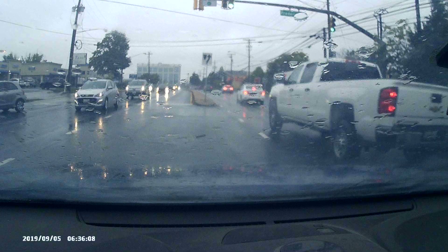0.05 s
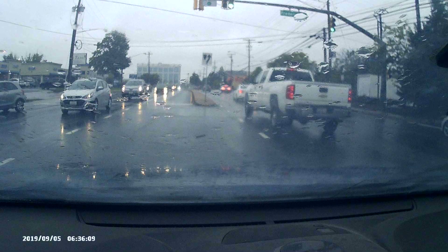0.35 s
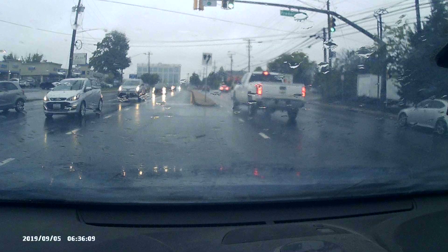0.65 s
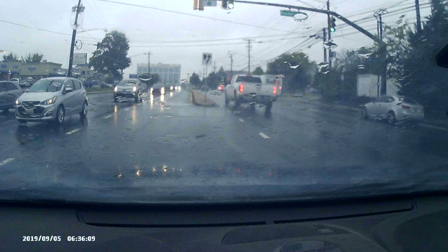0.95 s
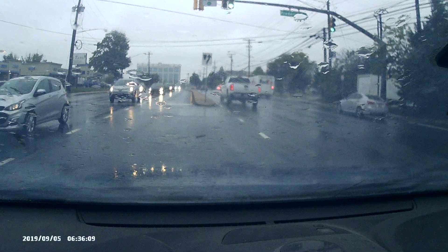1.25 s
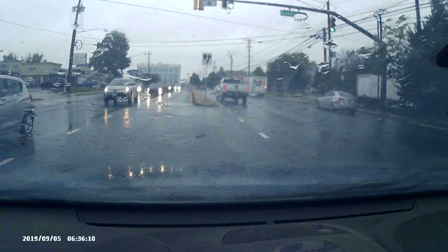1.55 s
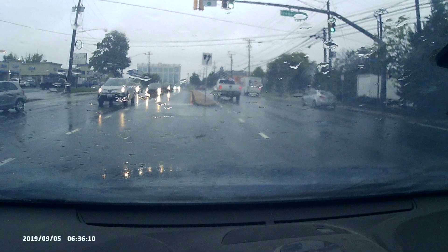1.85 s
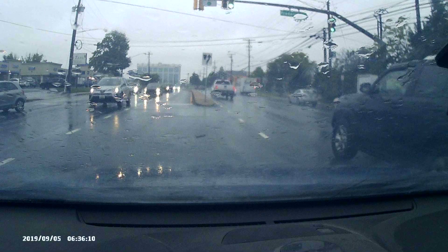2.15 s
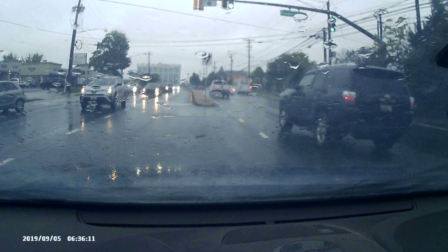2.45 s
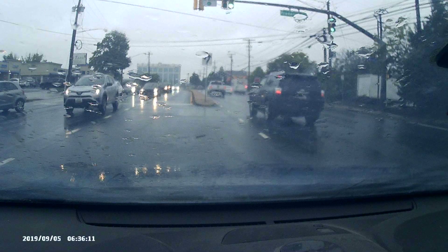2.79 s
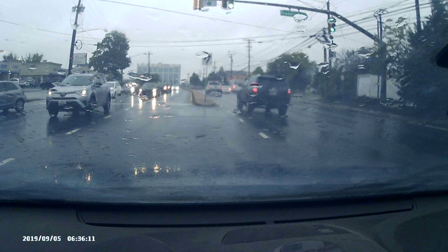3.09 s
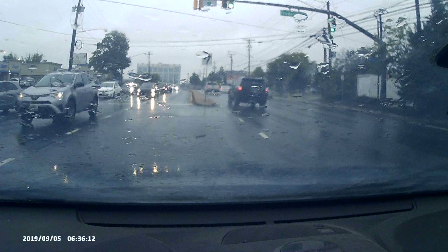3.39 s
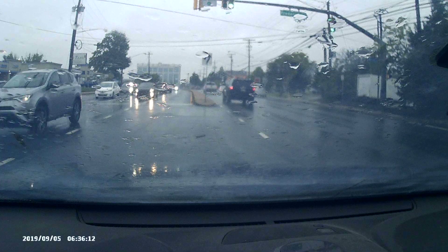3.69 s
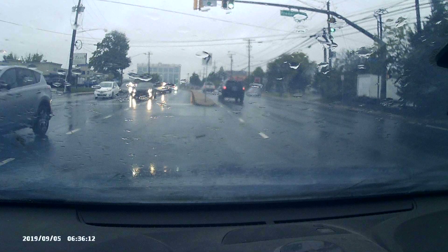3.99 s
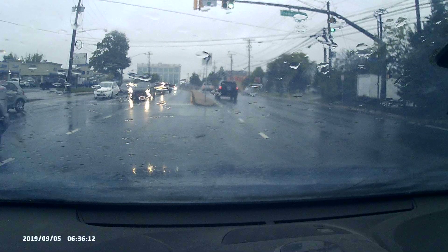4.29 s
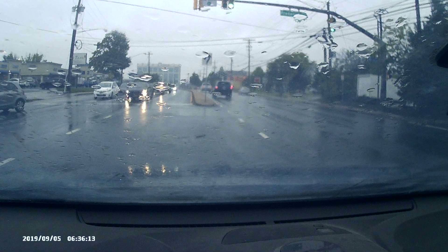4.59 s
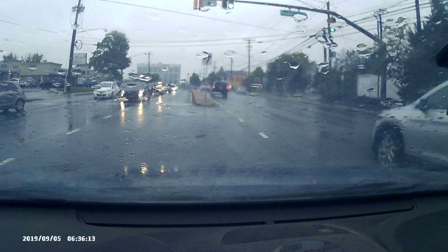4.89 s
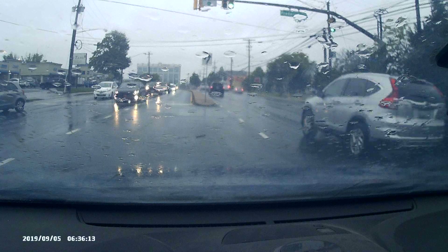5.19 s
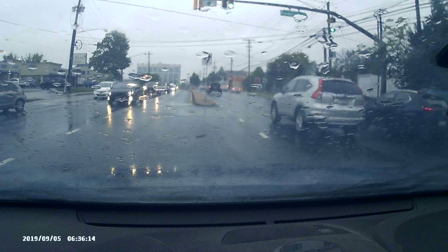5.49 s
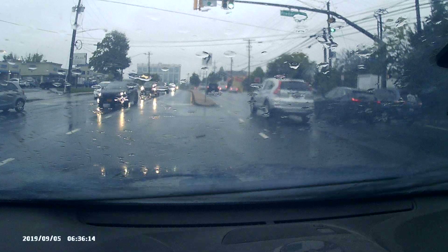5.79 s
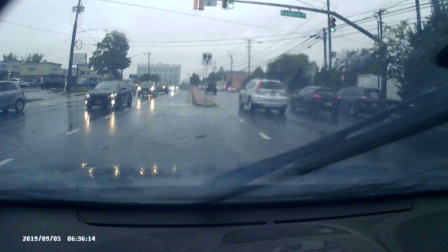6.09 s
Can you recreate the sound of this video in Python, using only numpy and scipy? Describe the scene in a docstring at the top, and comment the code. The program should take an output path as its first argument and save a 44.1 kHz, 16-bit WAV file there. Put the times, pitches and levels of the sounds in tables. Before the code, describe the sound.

Inside a closed car waiting at a wet intersection, the engine idles with a low, throbbing boom and the turn signal ticks and tocks evenly. Other cars pass outside with muffled engine drone, tyre roar and a hiss of spray. About a second in, something is handled, with a few knocks on plastic trim, crackles and rubbing. At the very end the wipers give one dull thud.

```python
"""Idling at a wet intersection

Inside a car, the engine's firing pulses boom low while the turn signal relay ticks and tocks.
Other engines drone through the closed body; passing tyres roar and throw spray off the wet road.
About a second in, something is handled: knocks on the trim, crackles and rubbing. Later comes
a faint squeak, and at the very end the wipers turn round with a thud."""
import sys
import numpy as np
from scipy import signal
from scipy.fft import rfft, irfft
from scipy.io import wavfile

SR = 44100
rng = np.random.default_rng(int(sys.argv[2]) if len(sys.argv) > 2 else 0)


def unload_audio(sound):
    """Save the sound as a 16-bit wav file, at the path given as the first command line argument."""
    columns = np.transpose(np.atleast_2d(sound))
    # keep every value between -1 and 1, then stretch to whole-number steps
    steps = np.round(np.clip(columns, -1, 1) * 32767)
    wavfile.write(sys.argv[1], SR, steps.astype(np.int16))


N = 270980
T = np.arange(N) / SR

# partials of the idle: (multiple of the firing rate, relative level [dB])
IDLE_ORDERS = [(.5, -20), (1, 0), (2, -18), (3, -27), (4, -34)]
# brief dips in its boom: (time [s], half width [s], depth [dB])
IDLE_DIPS = [(1.23, 0.023, 16), (1.39, 0.038, 10.5), (1.65, 0.21, 4)]
# a second low tone that throbs against the idle: (time [s], level [dB])
THROB_LEVEL = [(0, -46), (1.4, -49), (3, -55), (4.6, -50), (5.4, -43.5), (6.14, -43.5)]
# the relay's ring: (frequency [Hz], weight closing [dB], weight opening [dB], t60 [s])
RELAY_MODES = [(1290, -8.5, -29.5, 0.18), (1782, 1.5, -9, 0.086), (1930, -17, -13, 0.065),
               (2430, -23, -26.5, 0.029), (2560, 3, -10, 0.044), (2920, -3.5, -8.5, 0.026),
               (3670, -1.5, -12.5, 0.09), (3860, -4.5, -12.5, 0.048), (4034, -5, -2, 0.068),
               (4400, -4, -4, 0.1), (4530, -23, -7, 0.056), (4900, -7.5, -12.5, 0.054)]
# clicks of its contacts, closing and opening: (frequency [Hz], relative level [dB])
TICK_CLICK = [(700, -29.5), (1300, 2.5), (1900, 3.5), (2800, 1.5), (4200, 0), (5500, -3.5), (7400, -5.5),
              (8600, -15)]
TOCK_CLICK = [(700, -21), (1500, -7), (3300, -9), (3900, 3.5), (4500, -2), (5000, -12.5), (6500, -21),
              (8500, -26)]
# cars going by, each at its nearest:
# (time [s], distance [m], rumble [dB], roar [dB], swish [dB], glass hiss [dB], spray [dB])
PASSES = [(-.1, 6.5, -42, -56, -66.5, -75, -77.5), (1.498, 4.4, -50.5, -68.5, -72, -74.5, -68),
          (2.43, 4.3, -44.5, -60, -75.5, -78, -83), (3.7, 5.1, -58, -74, -79, -79.5, -74.5),
          (5.7, 6.8, -55, -63, -74, -73.5, -79)]
# colours of the tyre noises: (frequency [Hz], relative level [dB])
RUMBLE = [(8, 0.5), (22, 6), (42, -2.5), (60, -5), (85, -0.5), (130, -7.5), (200, -16), (260, -14),
          (340, -14.5), (450, -24.5), (700, -34), (1500, -72.5)]
ROAR = [(200, -19), (400, 2), (520, 1), (690, 0.5), (770, -1), (870, -2.5), (1050, -5), (1300, -10.5),
        (2000, -29), (4000, -55)]
SWISH = [(700, -25), (1300, -1), (1750, 1.5), (2100, 0.5), (2550, -2.5), (2950, 0), (3400, -3),
         (4000, -4.5), (5000, -9.5), (8000, -36)]
SPRAY = [(1500, -20), (3000, -7.5), (4200, -2.5), (5200, 1.5), (6300, -0.5), (7400, -4), (8500, -14)]
TREAD = [(400, -34), (720, -3), (860, 5.5), (980, -4.5), (1150, -10), (1800, -36.5)]
GLASS_HISS = [(1800, -33.5), (2600, -6.5), (2950, 1.5), (3400, -3.5), (3900, -4.5), (5500, -27)]
# an engine pulling away through two gear changes: (time [s], firing rate [Hz], level outside [dB])
PULLING_ENGINE = [(0.0, 55.3, -35), (0.07, 57.46, -41), (0.31, 56.73, -36.5), (0.65, 52.47, -44),
                  (1.25, 51.3, -50), (1.49, 44.18, -43.5), (1.73, 41.37, -51.5), (1.85, 42.82, -46.5),
                  (2.1, 50.0, -46.5), (2.41, 51.84, -47.5), (4.21, 49.79, -50.5), (4.58, 46.23, -50.5),
                  (4.96, 44.96, -51.5), (5.08, 42.77, -50.5), (5.23, 44.23, -52.5), (5.3, 42.08, -49),
                  (5.68, 42.66, -52.5), (6.14, 40.3, -51)]
# how the car body lets its harmonics in: (frequency [Hz], gain [dB])
BODY_GAIN = [(42, -8.5), (57, -8), (82, -2.5), (112, -1), (126, -12), (141, -13.5), (154, -7.5),
             (170, -19.5), (186, -8), (202, -6.5), (220, -26.5), (250, -22), (284, -15), (308, -15.5),
             (345, -28)]
# a steadier engine further off: (time [s], firing rate [Hz], fundamental [dB], octave [dB])
FAR_ENGINE = [(0, 74, -35, -62), (.45, 74.5, -41, -52.5), (.8, 76, -51, -61), (1.1, 77, -53, -49),
              (1.6, 79, -55.5, -66.5), (6.14, 76.5, -54.5, -73.5)]
# knocks on the cabin trim: (time [s], gain [dB], hollow low modes against the high ones [dB])
KNOCKS = [(0.8497, -39, 4), (0.8533, -28.5, 5), (.862, -59, 2), (.929, -38, -6), (.975, -38.5, 7.5),
          (1.056, -45, -24), (1.248, -35, 7), (6.119, -46, -6), (6.124, -38, -14)]
# the trim's ring: (frequency [Hz], weight [dB], t60 [s])
TRIM_MODES = [(228, -3.5, .14), (510, -4, 0.018), (675, 2.5, 0.043), (900, -4.5, 0.038), (1120, -26.5, .05),
              (1566, -6, 0.045), (2060, -10.5, .03), (2620, 4, 0.015), (2930, 1, 0.022), (3770, -21, 0.048)]
# small dry crackles: (time [s], gain [dB])
CRACKLES = [(0.9203, -47), (0.9543, -42.5), (0.9742, -47), (1.013, -48.5), (1.037, -47.5), (1.5165, -53),
            (6.0653, -46), (6.1206, -41.5), (6.1374, -45.5)]
# rubs of the handled thing: (start [s], length [s], starting gain [dB])
RUBS = [(.81, .07, -57), (.96, .22, -52), (1.5, .12, -78)]
# colours of a knock's click, a crackle, a slip and the wiper thud: (frequency [Hz], relative level [dB])
TRIM_CLICK = [(200, 10), (700, 13.5), (1500, -4.5), (3000, -1.5), (4000, -13.5), (6000, -14), (8500, -32)]
CRACKLE_CLICK = [(500, -22.5), (1500, 2.5), (3000, 7), (4200, 4), (5600, 4.5), (7500, -2.5), (8600, -5.5)]
SLIP = [(150, 12), (450, 7), (900, -3), (1550, 4), (2200, -3), (3000, -3), (4500, -9.5), (8000, -18.5)]
WIPER_THUD = [(10, 18.5), (28, -1), (60, -9), (125, -6), (170, -2.5), (230, -4), (380, -19), (700, -20),
              (1100, -30), (2000, -35.5), (4000, -55)]
# the two steps of a squeak: (start [s], length [s], pitch [Hz], level [dB])
SQUEAKS = [(3.955, .025, 2750, -68), (3.972, .045, 3120, -70)]


def idle(firing_hz=33.4, sag_hz_per_s=.1, level_db=-33, fan_hz=318.5, fan_db=-72, throb_hz=40.8):
    """Firing pulses boom in the cabin as an almost pure low tone that throbs; a fan hums faintly."""
    dips_db = sum(depth_db * bell(s, half_width) for s, half_width, depth_db in IDLE_DIPS)
    cycles = np.cumsum(firing_hz - sag_hz_per_s * T) / SR
    boom = np.zeros(N)
    for order, db in IDLE_ORDERS:
        waver_db = (.85 if order == 1 else 2) * drift(8.6)
        boom += amp(db + waver_db) * tone(order * cycles)
    fan_gain = amp(fan_db + 3.4 * drift(2.3))
    fan = fan_gain * np.sin(2 * np.pi * np.cumsum(fan_hz + 1.5 * drift(4)) / SR)
    throb = amp(curves(THROB_LEVEL)[0]) * tone(throb_hz * T)
    return np.sqrt(2) * (amp(level_db - dips_db) * boom + fan + throb)


def turn_signal(blink_s=.70087, first_tick_s=.3935, first_tock_s=.044, tick_db=-45.5, tock_db=-55):
    """The relay snaps shut, then falls open with a bounce; the windscreen reflects each click."""
    hz, shut_db, open_db, t60 = np.transpose(RELAY_MODES)
    tick = amp(-9) * ring(hz, shut_db, t60) + amp(-4) * snap(TICK_CLICK, crack_db=.5, t60=.034)
    tock = amp(-2) * ring(hz, open_db, t60) + amp(-2) * snap(TOCK_CLICK, crack_db=2, t60=.066)
    tick = echoes(tick, [(.0145, -13)])
    tock = echoes(tock, [(.0035, -14), (.0135, -14)])
    out = np.zeros(N)
    for first_s, db, sound, spectrum in ((first_tick_s, tick_db, tick, TICK_CLICK),
                                         (first_tock_s, tock_db, tock, TOCK_CLICK)):
        for s in np.arange(first_s, N / SR, blink_s):
            variation = .26 * burst(spectrum, t60=.085, rise=.0023)
            add(out, s, amp(db) * (sound + variation))
    return out


def tyres(spray_shadow=2.7):
    """Passing tyres rumble through the body, roar and throw water, over a wash of distant traffic."""
    _, _, rumble_db, roar_db, swish_db, glass_db, spray_db = np.transpose(PASSES)
    rumble = going_by(rumble_db, wash_db=-50.5) * noise(RUMBLE, flutter_db=2.5, flutter_hz=4.9)
    roar = going_by(roar_db, wash_db=-66) * noise(ROAR, flutter_db=1.04, flutter_hz=22)
    swish = going_by(swish_db, wash_db=-73.5) * noise(SWISH, flutter_db=-.3, flutter_hz=50)
    # spray is thrown forward, so it fades faster once the car is past
    spray_gain = going_by(spray_db, wash_db=-78.5, shadow=spray_shadow)
    spray = spray_gain * noise(SPRAY, flutter_db=1, flutter_hz=80)
    # the tread sings ahead of each car and again as it passes
    ahead = going_by(roar_db - 7.5, wash_db=-71, lead_s=.85)
    alongside = going_by(roar_db - 12.5, wash_db=-np.inf)
    tread = np.hypot(ahead, alongside) * noise(TREAD, flutter_db=1.5, flutter_hz=7.6)
    hiss = going_by(glass_db, wash_db=-81.5) * noise(GLASS_HISS, flutter_db=1, flutter_hz=40)
    return rumble + roar + swish + spray + tread + hiss


def going_by(peaks_db, wash_db, lead_s=0, shadow=1, speed_m_per_s=15.4):
    """Fader for one tyre layer: each car falls off as 1 / distance, and their powers add to the wash."""
    power = amp(wash_db) ** 2
    for (s, distance_m, *_), db in zip(PASSES, peaks_db):
        along_m = speed_m_per_s * (T - s + lead_s)
        along_m = np.where(along_m > 0, shadow * along_m, along_m)
        power = power + amp(db) ** 2 / (1 + (along_m / distance_m) ** 2)
    return np.sqrt(power)


def engines(hum_s=2.92, hum_hz=238.5, hum_sag_hz_per_s=42, hum_db=-60.5):
    """One engine pulls away, one holds steady, and an overtaking car's hum swells and falls in pitch."""
    hz, outside_db = curves(PULLING_ENGINE)
    body_hz, body_db = np.transpose(BODY_GAIN)
    inside_db = [outside_db + np.interp(np.log(k * hz), np.log(body_hz), body_db) for k in range(1, 7)]
    pulling = drone(hz, inside_db, jitter=.0035, waver_db=1.5)
    hz, fundamental_db, octave_db = curves(FAR_ENGINE)
    steady = drone(hz, [fundamental_db, octave_db], jitter=.0036, waver_db=2.2)
    hum = drone(hum_hz - hum_sag_hz_per_s * (T - hum_s), [hum_db], jitter=.0034, waver_db=.1)
    return pulling + steady + bell(hum_s, half_width=.45) * hum


def drone(hz, levels_db, jitter, waver_db):
    """An engine heard through the car body: only its lowest harmonics get in."""
    cycles = np.cumsum(hz * (1 + jitter * drift(11))) / SR
    partials = [amp(db + waver_db * drift(3.6)) * tone(k * cycles) for k, db in enumerate(levels_db, 1)]
    return np.sqrt(2) * sum(partials)


def handling(hollow_below_hz=1200):
    """Knocks ring the plastic trim; dry crackles fall among them."""
    out = np.zeros(N)
    hz, mode_db, t60 = np.transpose(TRIM_MODES)
    for s, db, hollow_db in KNOCKS:
        body = amp(-6) * ring(hz, mode_db + hollow_db * (hz < hollow_below_hz), t60)
        click = amp(-12) * snap(TRIM_CLICK, crack_db=12, t60=.12)
        add(out, s, amp(db) * (body + click))
    for s, db in CRACKLES:
        add(out, s, amp(db - 5) * snap(CRACKLE_CLICK, crack_db=1.5, t60=.052))
    return out


def wipers(turn_s=6.065, gain_db=-26.5):
    """The wipers turn round and shake the windscreen: one dull thud through the glass."""
    out = np.zeros(N)
    add(out, turn_s, amp(gain_db) * burst(WIPER_THUD, t60=.64, rise=.0011))
    return out


def rustle(slips_per_s=500, spread_db=3, attack_s=.023, sag_db_per_s=23, release_s=.03):
    """The handled thing rubs in many tiny slips of uneven size; each rub starts firmly and eases off."""
    sizes = amp(spread_db * np.minimum(rng.exponential(1, N), 4)) * rng.choice([-1, 1], N)
    slips = sizes * (rng.random(N) < slips_per_s / SR)
    pressure = np.zeros(N)
    for start, length, db in RUBS:
        t = np.maximum(T - start, 0)
        attack = np.minimum(t / attack_s, 1)
        release = np.exp(-np.maximum(t - length, 0) / release_s)
        pressure += attack * amp(db - sag_db_per_s * t) * release
    friction = signal.oaconvolve(slips, burst(SLIP, t60=.032, rise=.00043))[:N]
    return pressure * unit(friction)


def squeak():
    """Something slips briefly with a thin whistle that steps up in pitch."""
    out = np.zeros(N)
    for s, length, hz, db in SQUEAKS:
        t = np.arange(0, length, 1 / SR)
        swell = np.sin(np.pi * t / length)
        add(out, s, np.sqrt(2) * amp(db) * swell * np.sin(2 * np.pi * hz * t))
    return out


def snap(spectrum, crack_db, t60):
    """A click: the direct crack of a few milliseconds, then the cabin's reflections."""
    crack = amp(crack_db) * burst(spectrum, t60=.012, rise=.0003)
    return crack + burst(spectrum, t60=t60, rise=.0002)


def burst(spectrum, t60, rise, size=6000):
    """A dense, coloured cloud of reflections that swells quickly and dies away."""
    t = T[:size]
    cloud = irfft(np.exp(2j * np.pi * rng.random(size // 2 + 1)), size)
    envelope = np.exp(-np.log(1000) * t / t60) * (1 - np.exp(-t / rise))
    return unit(colour(cloud, spectrum)) * envelope


def ring(hz, db, t60, size=6000):
    """Dying modes of a struck part, scaled to power 1 at the start."""
    t = T[:size, None]
    envelopes = amp(db) * np.exp(-np.log(1000) * t / t60)
    modes = envelopes * np.sin(2 * np.pi * (hz * t + rng.random(len(hz))))
    return modes.sum(1) / np.sqrt(np.sum(amp(db) ** 2) / 2)


def echoes(x, taps):
    """Adds delayed copies: (delay [s], gain [dB])."""
    out = x.copy()
    for s, db in taps:
        add(out, s, amp(db) * x)
    return out


def noise(spectrum, flutter_db, flutter_hz):
    """Coloured noise whose level flutters."""
    return unit(colour(rng.standard_normal(N), spectrum) * amp(flutter_db * drift(flutter_hz)))


def colour(x, spectrum):
    """EQs x with a curve drawn on a log-frequency axis."""
    hz, db = np.transpose(spectrum)
    f = np.fft.rfftfreq(len(x), 1 / SR)
    return irfft(rfft(x) * amp(np.interp(np.log(f + 1), np.log(hz), db)), len(x))


def drift(rate_hz):
    """A smooth random wobble of rms 1."""
    f = np.fft.rfftfreq(N, 1 / SR)
    return unit(irfft(rfft(rng.standard_normal(N)) / (1 + (f / rate_hz) ** 2) ** 2, N))


def tone(cycles):
    """A sine with a random starting phase."""
    return np.sin(2 * np.pi * (cycles + rng.random()))


def bell(s, half_width):
    """A smooth swell of height 1 around time s."""
    return np.exp(-((T - s) / half_width) ** 2)


def curves(rows):
    """The columns of a table as automation curves."""
    s, *columns = np.transpose(rows)
    return [np.interp(T, s, c) for c in columns]


def add(mix, s, sound):
    """Mixes a sound in at time s."""
    part = mix[max(round(s * SR), 0):][:len(sound)]
    part += sound[:len(part)]


def amp(db):
    """Decibels to gain."""
    return 10 ** (np.asarray(db) / 20)


def unit(x):
    """Scales to rms 1."""
    return x / np.sqrt(np.mean(x ** 2) + 1e-20)


def scene():
    """The mono mix, as heard at the windscreen."""
    bed = idle() + engines() + tyres()
    return (bed + turn_signal() + handling() + rustle() + squeak() + wipers())[None]


def record(dry):
    """A steep low-pass takes off the top treble."""
    cutoff_hz = 8350
    lowpass = signal.firwin(201, cutoff_hz, window=("kaiser", 8), fs=SR)
    return signal.oaconvolve(dry, lowpass[None], "same")


dry = scene()
out = record(dry)
unload_audio(out)
```